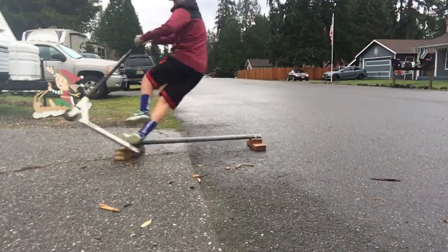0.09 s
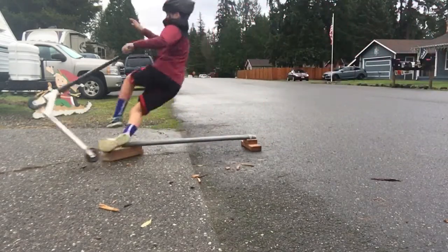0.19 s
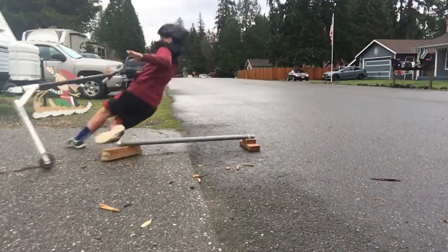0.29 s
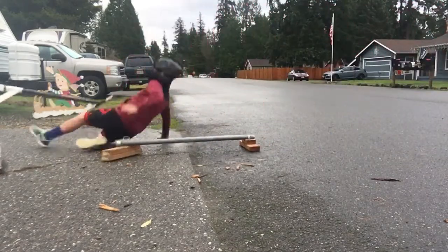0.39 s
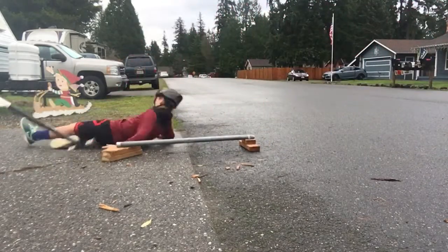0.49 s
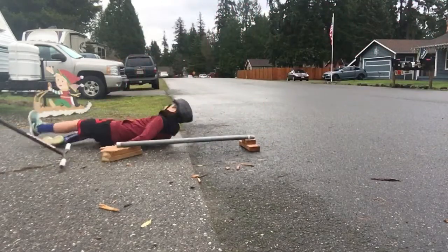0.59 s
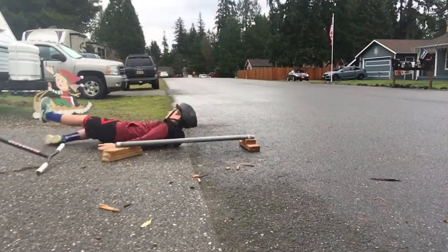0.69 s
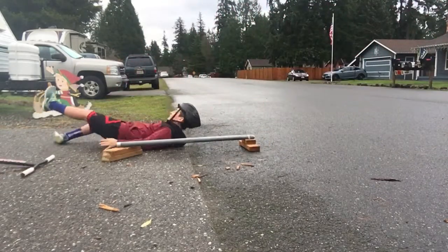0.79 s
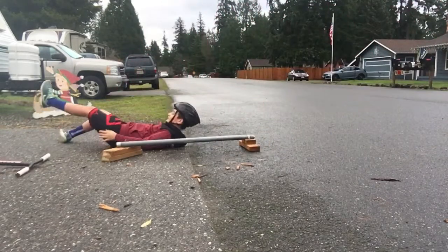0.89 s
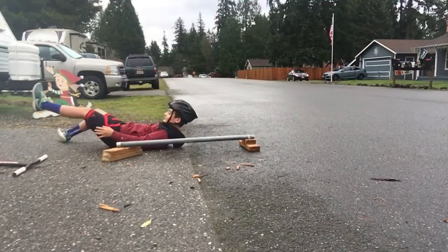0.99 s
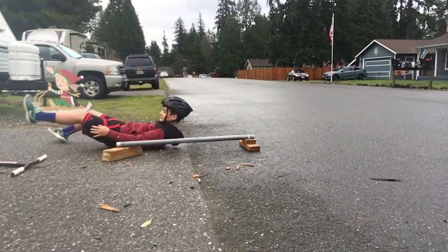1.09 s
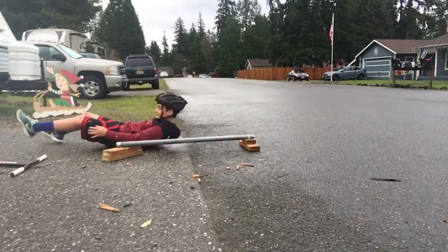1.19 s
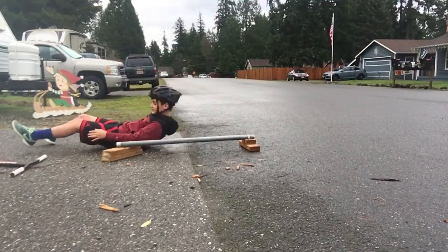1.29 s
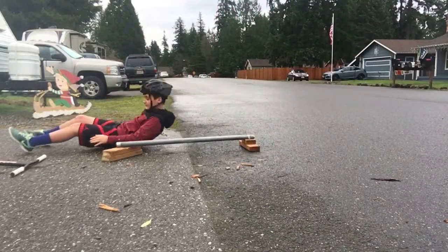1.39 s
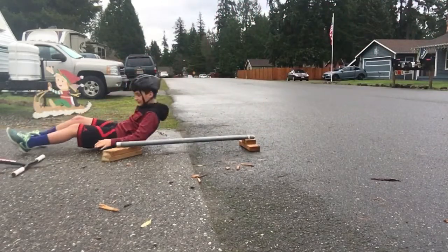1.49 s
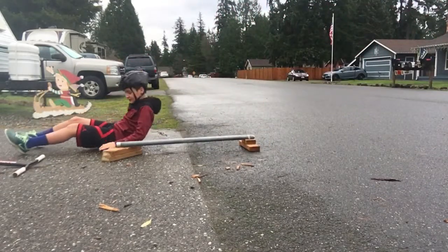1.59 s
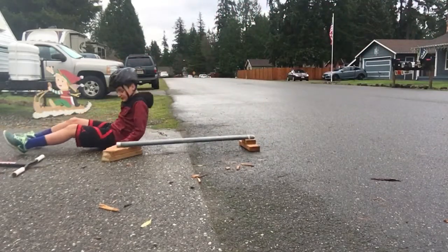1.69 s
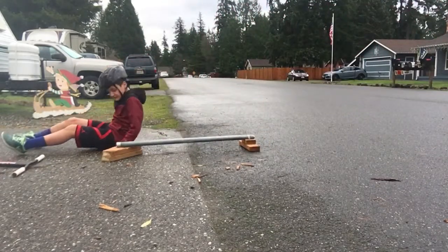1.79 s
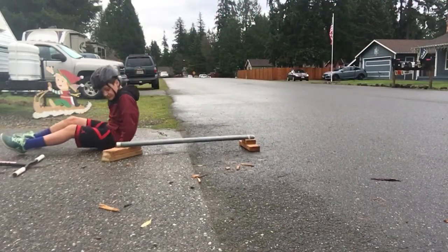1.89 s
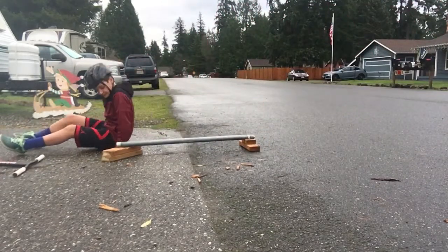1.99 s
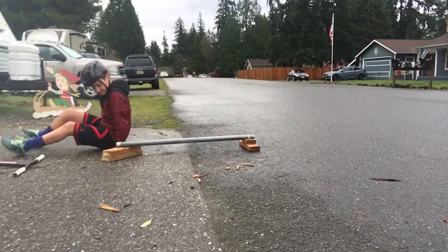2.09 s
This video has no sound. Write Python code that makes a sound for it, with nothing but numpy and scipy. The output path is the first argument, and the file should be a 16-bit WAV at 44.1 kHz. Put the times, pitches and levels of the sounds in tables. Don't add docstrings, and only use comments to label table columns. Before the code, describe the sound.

A kick scooter crashes on a quiet street. Thin tubes clang faintly at the start and at 0.15 s; dull body thuds and sharp ticks follow from 0.2 to 0.4 s. The deck slams at 0.44 s. Scraping leads to the hardest rail bang at 0.72 s, then fades by 1 s. After faint cloth rustle, hollow pipe-on-wood knocks come near 1.3, 1.52 and 1.8 s. Weak outdoor echoes, phone microphone.

```python
import sys
import numpy as np
from scipy import signal
from scipy.fft import rfft, irfft
from scipy.io import wavfile
from scipy.ndimage import uniform_filter1d

SR = 44100
rng = np.random.default_rng(int(sys.argv[2]) if len(sys.argv) > 2 else 0)


def transcribe(signal):
    frames = np.atleast_2d(signal).T
    limited = np.clip(frames, -1, 1)
    pcm = np.round(limited * 32767).astype(np.int16)
    wavfile.write(sys.argv[1], SR, pcm)


def makeup_ratio(level_db):
    decades = np.asarray(level_db, float) / 20
    return 10 ** decades


N = 92610
SPAN = 16384
SPLIT_HZ = 2200

# pitch in Hz, level in dB, t60 in seconds.
RAIL_MODES = [(468.3, -5.5, 0.18), (949, 7, 0.069), (1068, 5.5, 0.03), (1268, 0.5, 0.15),
              (1572, -3.5, 0.16), (1700, -6, 0.064), (1913, -7, 0.35), (2400, -29.5, 0.35),
              (2764, -7.5, 0.069), (3465, -25, 0.18), (3940, -16.5, 0.18)]


def unit(x):
    return x / np.sqrt(np.mean(x ** 2) + 1e-20)


def half_peak(x):
    return x / np.sqrt(uniform_filter1d(x ** 2, size=100).max() * 4)


def colour(x, table):
    f, db = np.array(table).T
    hz = np.arange(2049) * SR / 4096
    gain_db = np.interp(np.log(hz + 1), np.log(f), db)
    cep = irfft(np.log(makeup_ratio(gain_db)))
    cep[1:2048] *= 2
    impulse = irfft(np.exp(rfft(cep[:2049], 4096)))[:2048]
    return signal.fftconvolve(x, impulse)[:len(x)]


def band(x, lo_hz, hi_hz):
    sos = signal.butter(2, [lo_hz, min(hi_hz, .45 * SR)], "band", fs=SR, output="sos")
    return signal.sosfilt(sos, x)


def walk(rate_hz):
    k = int(SR / rate_hz)
    steps = np.repeat(rng.standard_normal(N // 20), k)[:N]
    return unit(uniform_filter1d(uniform_filter1d(steps, k), k))


def blows(table, tone, modes, ring_db, first_db, crack_share, rough):
    # frequency in Hz, gain in dB.
    thud_tone = [(25, -49), (60, -7), (140, -10), (250, 1), (330, -7.5), (600, -42.5)]
    out, t = np.zeros(N + SPAN), np.arange(SPAN) / SR
    rise = 1 - np.exp(-t / .001)
    first = makeup_ratio(first_db) * (np.arange(SPAN) == 20)
    settle = 1 - (.6 if len(modes) > 9 else 0) * np.exp(-t / .006)
    for s, db, thud_db, crack_db, t60 in table:
        uneven = makeup_ratio(2 * rng.standard_normal(SPAN // 64).repeat(64))
        grit = rng.standard_normal(SPAN) * uneven
        luck, wobble = rng.standard_normal(14), rng.standard_normal((14, SPAN // 128 + 1))
        t60 = max(t60, .004)
        push = grit * makeup_ratio(-60 * t / t60) * rise + first
        sharp_decay = makeup_ratio(-60 * t / (t60 * crack_share)) + makeup_ratio(-11.5 - 30 * t / t60)
        sharp = grit * sharp_decay * rise + .5 * first

        ring = 0
        for (hz, g_db, ring_s), r, w in zip(modes, luck, wobble):
            lift_db = crack_db + 12 if hz > SPLIT_HZ else thud_db + 15 if hz < 400 else 0
            drift = np.interp(t * SR / 128, np.arange(len(w)), np.cumsum(w) - w[0])
            blur = rough * np.sqrt(hz / 1000) * drift
            decay = makeup_ratio(g_db + lift_db + 2 * r - 60 * t / max(ring_s, .01))
            ring = ring + decay * np.sin(2 * np.pi * hz * t + blur)

        knock = half_peak(band(band(colour(push, tone), 400, SPLIT_HZ), 300, SPLIT_HZ))
        thud = half_peak(colour(push, thud_tone))
        crack = half_peak(band(colour(sharp, tone), SPLIT_HZ, 19000))
        sound = knock * settle + makeup_ratio(thud_db) * thud + makeup_ratio(crack_db) * crack + makeup_ratio(ring_db) * ring * rise
        i = max(int(s * SR) - 20, 0)
        out[i:i + SPAN] += makeup_ratio(db) * sound
    return out[:N]


def tube_clangs():
    # start in seconds, peak in dB, thud below 400 Hz in dB rel,
    # crack above 2.2 kHz in dB rel, chatter t60 in seconds.
    tube_hits = [
        (.001, -26, 0.5, -7, 0.16),
        (.152, -22, -36.5, -9.5, 0.04),
        (.188, -24.5, -3.5, -8.5, 0.054),
    ]
    # frequency in Hz, gain in dB.
    tube_tone = [(300, -7), (1500, -5), (2600, -9.5), (7400, -14), (9500, -22), (14000, -31)]
    # pitch in Hz, level in dB, t60 in seconds.
    tube_modes = [(1280, 0, .06), (5905, -10, .12), (9017, -14, .08), (11470, -16, .1), (2600, 0, .14),
                  (7284, -6, .14), (13700, -10, .09)]
    return (blows(tube_hits[:1], tube_tone, tube_modes[:-2], -18, 8, .8, .5)
            + blows(tube_hits[1:], tube_tone, tube_modes[4:], -16, 8, .8, .5))


def skid():
    # time in seconds, level in dB, grit above 2.2 kHz in dB rel.
    drag = [(0, -53, 11), (0.133, -54, -7.5), (0.156, -41.5, 1), (.4, -44, 1), (.5, -32, -8.5),
            (.6, -38, -11), (0.702, -34.5, -13.5), (0.8, -32.5, -6.5), (0.881, -33.5, -13.5),
            (0.961, -44.5, -11.5), (1.051, -53, -8), (1.278, -65.5, -27), (1.329, -36, -22),
            (1.48, -39.5, -9), (1.57, -43, 2), (1.71, -69, -5), (1.749, -46, -16), (1.879, -45, -34),
            (1.951, -78, -16)]
    # frequency in Hz, gain in dB.
    drag_tone = [(60, -8), (300, 2.5), (1000, 5), (1950, 4.5), (2250, -4), (4500, -17), (5000, -16.5),
                 (12000, -37.5)]
    grains_per_s = 1800
    s, db, grit_db = np.array(drag).T
    t = np.arange(N) / SR
    hits = rng.random(N) < grains_per_s / SR
    grains = hits * rng.standard_normal(N) * makeup_ratio(1.7 * rng.standard_exponential(N))
    push = unit(grains) + 0.71 * rng.standard_normal(N)
    scrape = colour(push, drag_tone)

    def shaken(hz):
        return unit(band(push, hz * .98, hz * 1.02))

    low_rail = sum(makeup_ratio(min(g_db, 0)) * shaken(hz) for hz, g_db, _ in RAIL_MODES[:7])
    high_rail = sum(shaken(hz) for hz, _, _ in RAIL_MODES[7:])
    mid = unit(band(band(scrape, 60, SPLIT_HZ), 30, SPLIT_HZ)) + makeup_ratio(-9) * unit(low_rail)
    grit = unit(band(scrape, SPLIT_HZ, 19700)) + makeup_ratio(-6) * unit(high_rail)
    grit = grit * makeup_ratio(np.interp(t, s, grit_db) + 1.6 * walk(70))
    hiss = unit(band(band(push, 7500, 17000), 7500, 17000)) * makeup_ratio(-14.5) * (t > .15) * (t < .42)
    return (mid + grit + hiss) * makeup_ratio(np.interp(t, s, db) + 2 * walk(46.8))


def street():
    # frequency in Hz, gain in dB.
    hush_tone = [(25, -17.5), (60, 1), (250, -5.5), (800, -3.5), (2000, -25.5), (5000, -35), (10000, -48.5),
                 (16000, -64.5)]
    level_db = -50
    hush = colour(rng.standard_normal(N), hush_tone)
    octaves = sum(band(hush, 22 * 2 ** k, 44 * 2 ** k) * makeup_ratio(walk(9)) for k in range(10))
    return makeup_ratio(level_db) * unit(octaves)


def knocks():
    # start in seconds, peak in dB, pitch in Hz, t60 in seconds.
    contacts = [(0.154, -26.5, 1590, 0.036), (.276, -26, 330, 0.057), (.424, -17, 567, 0.063),
                (0.438, -11.5, 870, 0.017), (.440, -17, 196, 0.044), (.4425, -12, 1750, .03),
                (.449, -12, 545, 0.022), (.456, -24, 328, .35), (.458, -27.5, 680, .3),
                (0.455, -22.5, 1523, 0.24), (.452, -38, 6600, .25), (0.715, -16, 1290, 0.01),
                (.832, -26, 1047, .03), (1.284, -34.5, 890, .03), (1.321, -27.5, 3950, .05),
                (1.33, -42, 4090, .3), (1.34, -29, 2800, .12), (1.33, -30, 3465, .08),
                (.002, -39, 5900, .15), (.002, -47, 11400, 0.15), (.01, -50, 7400, .2),
                (.153, -56.5, 9880, .15), (.153, -52.5, 12600, .15), (.153, -54, 15000, .15),
                (.153, -32.5, 2637, .12), (.189, -40, 13800, .08), (.442, -20, 5730, .03),
                (.488, -35.5, 3990, .15), (.42, -26.5, 4450, .06), (1.549, -32, 3460, .15),
                (.728, -7, 249, 0.034), (1.2921, -5, 980, 0.0096), (1.318, -0.5, 1020, 0.012),
                (1.319, -15.5, 1253, 0.02), (1.437, -28.5, 510, 0.025), (1.52, -1, 1013, 0.013),
                (1.5396, -8, 1110, 0.019), (1.545, -18.5, 1700, 0.052), (1.638, -32, 535, 0.058),
                (1.779, -32, 1103, 0.063), (1.7916, -10.5, 1040, 0.019), (1.793, -18, 1700, 0.059),
                (1.79, -23, 4070, 0.018), (1.802, -23.5, 3440, 0.057), (1.796, -38, 2449, 0.37),
                (1.837, -25.5, 1880, 0.048), (1.868, -36, 2758, 0.14)]
    slam = [
        (.7232, 2, 1300, .008),
        (.7256, 1, 1000, .01),
        (.7228, -12, 1700, .025),
        (.7235, -10, 820, .03),
    ]
    contact_s, flutter_db, flutter_s = 0.00041, 4, .012
    blur_rad = .045
    out, t = np.zeros(N + SPAN), np.arange(SPAN) / SR
    for s, db, hz, t60 in contacts + slam:
        i, shake = int(s * SR), rng.standard_normal(32)
        rattles = t60 > .06
        wander = np.interp(t / flutter_s, np.arange(len(shake)), shake) - shake[0]
        flutter = flutter_db * wander * rattles
        blur = blur_rad * np.sqrt(hz / 1000) * np.cumsum(rng.standard_normal(SPAN)) * rattles
        push = 1 - np.exp(-t / (contact_s * np.sqrt(1000 / hz)))
        decay = makeup_ratio(db + np.minimum(flutter, 2) - 60 * t / max(t60, .004))
        out[i:i + SPAN] += decay * push * 1.027 * np.sin(2 * np.pi * hz * t + blur)
    return out[:N]


def body_thuds():
    # start in seconds, peak in dB, thud below 400 Hz in dB rel,
    # crack above 2.2 kHz in dB rel, chatter t60 in seconds.
    body_hits = [(.089, -37.5, -2, -23, 0.032), (.129, -47, -7, 10.5, 0.026), (.168, -34.5, 3, -24, 0.094),
                 (.212, -16, -1, -22, 0.052), (.224, -26, -1.5, 0.5, 0.3), (.291, -34.5, -17.5, 7.5, 0.03),
                 (.275, -18, -7, -6.5, 0.044), (.308, -19, -14.5, -3.5, 0.063),
                 (.34, -23, 1.5, -5.5, 0.047), (.369, -22, -22, -12.5, 0.1),
                 (.401, -27.5, -18.5, -2, 0.091), (1.438, -30, -33, -41, 0.08),
                 (1.639, -29, -14, -31, 0.055)]
    # frequency in Hz, gain in dB.
    body_tone = [(300, 11.5), (1200, 21), (2200, 7.5), (4000, 11.5), (6500, 7), (10000, -4), (14000, -34.5)]
    return blows(body_hits, body_tone, [], -40, 23, 0.44, 0)


def hard_ticks():
    # start in seconds, peak in dB, thud below 400 Hz in dB rel,
    # crack above 2.2 kHz in dB rel, chatter t60 in seconds.
    tick_hits = [
        (.2235, -21.5, -18.5, 7, 0.0029),
        (.3125, -9, -17, -3.5, 0.0014),
        (.324, -30, -19, -31, 0.0051),
        (.386, -16.5, -8.5, 1.5, 0.0052),
    ]
    # frequency in Hz, gain in dB.
    tick_tone = [(300, -21.5), (1200, -13.5), (3300, -6.5), (5000, -22), (6800, -18), (10000, -51.5),
                 (14000, -35.5)]
    return blows(tick_hits, tick_tone, [], -40, 11, 0.98, 0)


def deck_slams():
    # start in seconds, peak in dB, thud below 400 Hz in dB rel,
    # crack above 2.2 kHz in dB rel, chatter t60 in seconds.
    deck_hits = [
        (.4195, -10, -25, -13.5, 0.2),
        (.441, -7, -9.5, -4, 0.069),
        (.457, -14.5, -13.5, -11, 0.097),
    ]
    # frequency in Hz, gain in dB.
    deck_tone = [(300, 15.5), (1500, 15), (2200, 18.5), (4500, 12), (6900, 12), (10000, -14), (14000, -4.5)]
    # pitch in Hz, level in dB, t60 in seconds.
    deck_modes = [(271, 6, 0.018), (328, -18, 0.1), (572, -12.5, 0.08), (680, -12.5, 0.158),
                  (932, -11, 0.023), (1202, -12.5, 0.45), (1550, -10.5, 0.17), (1990, -2.5, 0.083),
                  (1880, -32.5, 0.6), (2720, -11.5, 0.1), (3980, -24.5, 0.15), (6600, -28, 0.15)]
    return blows(deck_hits, deck_tone, deck_modes, -14, 3, .7, .12)


def rail_knocks():
    # start in seconds, peak in dB, thud below 400 Hz in dB rel,
    # crack above 2.2 kHz in dB rel, chatter t60 in seconds.
    rail_hits = [(.66, -39, -28, -7, .04), (.672, -19, -7.5, -5, 0.11), (.714, -33, -23, -1, 0.11),
                 (.7222, -6, -14, -4, 0.092), (.827, -25, -15, -14, 0.057),
                 (.921, -30.5, -13, -16.5, 0.025), (1.2915, -14, -4, -9, 0.17),
                 (1.317, -6.5, -12, -8, 0.08), (1.4, -24, -29, -5.5, 0.13), (1.503, -24.5, -36, -24, 0.14),
                 (1.5195, -9, -11.5, -12.5, 0.067), (1.5405, -14.5, -27, -16, 0.1),
                 (1.723, -24, -20, -15.5, 0.11), (1.736, -27, -21, -16.5, 0.15),
                 (1.7915, -14.5, -13, -5.5, 0.088), (1.836, -29.5, -16, -17, 0.33),
                 (1.854, -20.5, -9.5, -15, 0.14), (1.884, -28, -22, -17, 0.14)]
    # frequency in Hz, gain in dB.
    rail_tone = [(300, -10.5), (1000, -9.5), (1950, -1), (2250, -8.5), (4400, -13.5), (5000, -18),
                 (7000, -18.5), (14000, -45.5)]
    return blows(rail_hits, rail_tone, RAIL_MODES, -14, 2, .8, .25)


def cloth():
    # start in seconds, peak in dB.
    rustles = [
        (0.9744, -64),
        (1.0276, -63),
        (1.11, -69),
        (1.179, -50),
        (1.2004, -50),
    ]
    out, t = np.zeros(N), np.arange(882) / SR
    for s, db in rustles:
        i = int(s * SR)
        swell = np.sin(np.pi * t / t[-1]) ** 2
        out[i:i + len(t)] += makeup_ratio(db - 14) * band(rng.standard_normal(len(t)), 4300, 14000) * swell
    return out


def echoes(near):
    level_db, t60_s, top_hz, gap_s = -22, 0.5, 5560, .015
    t = np.arange(SPAN) / SR
    echo = band(rng.standard_normal(SPAN), 130, top_hz) * makeup_ratio(-60 * t / t60_s) * (t > gap_s)
    echo *= makeup_ratio(level_db) / np.sqrt(np.sum(echo ** 2))
    return signal.fftconvolve(near, echo)[:N]


def scene():
    near = tube_clangs() + skid() + knocks() + body_thuds() + hard_ticks() + deck_slams() + rail_knocks()
    return (near + echoes(near) + street() + cloth())[None]


def low_pass(x):
    return signal.sosfilt(signal.butter(12, 16510, fs=SR, output="sos"), x)


def record(dry):
    low_cut = signal.butter(2, 42, "high", fs=SR, output="sos")
    top_cut = signal.ellip(6, .3, 30, 15800, fs=SR, output="sos")
    mix = signal.sosfilt(top_cut, signal.sosfilt(low_cut, dry))
    return low_pass(mix)


dry = scene()
out = record(dry)
transcribe(out)
```